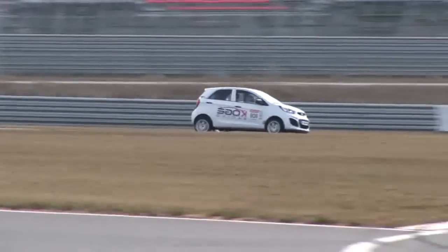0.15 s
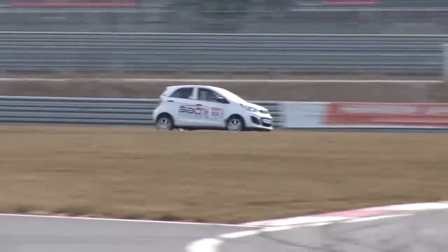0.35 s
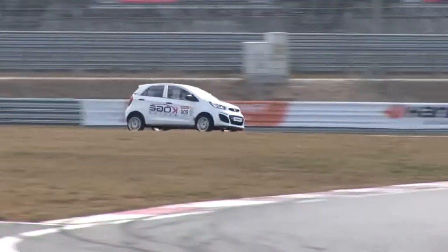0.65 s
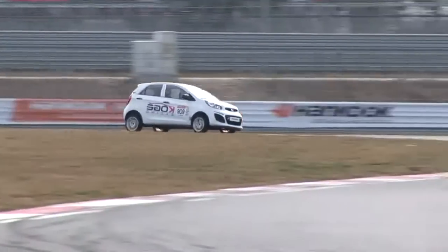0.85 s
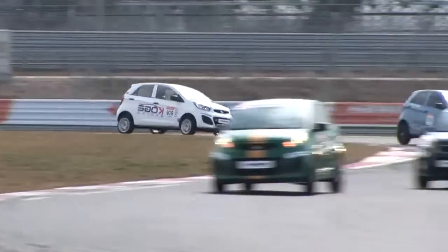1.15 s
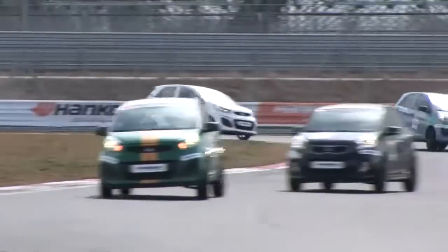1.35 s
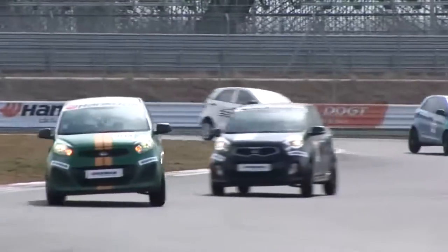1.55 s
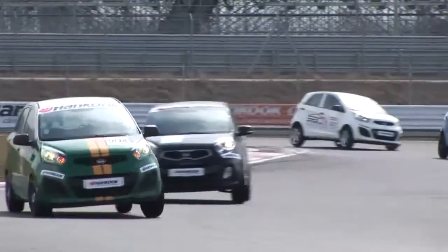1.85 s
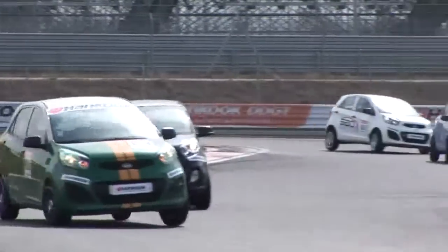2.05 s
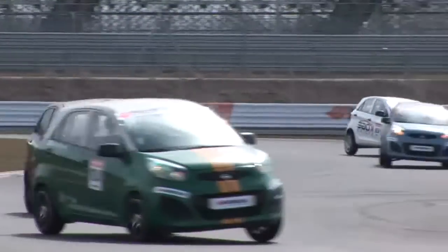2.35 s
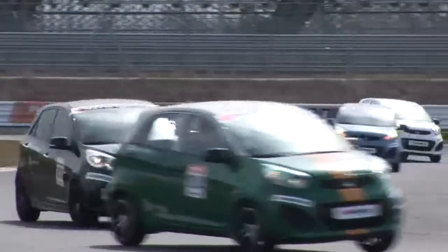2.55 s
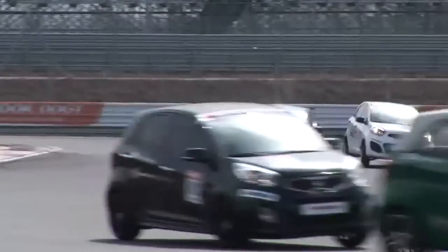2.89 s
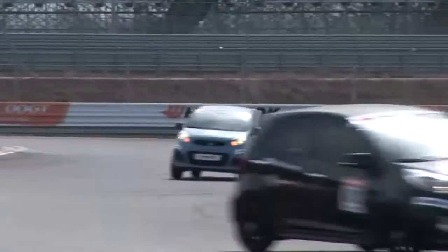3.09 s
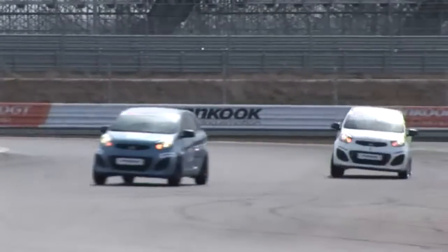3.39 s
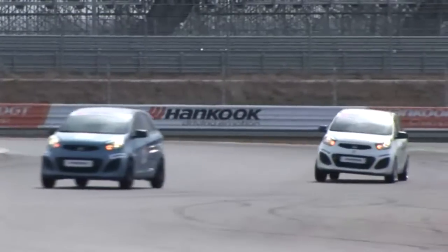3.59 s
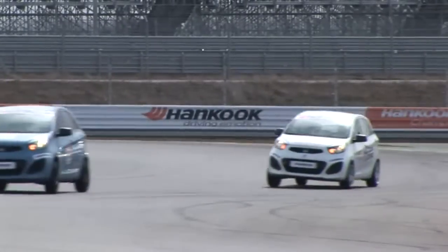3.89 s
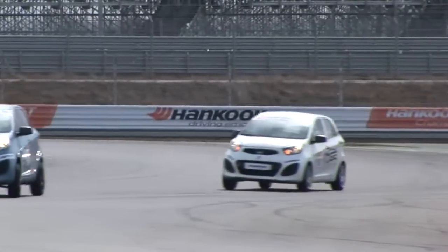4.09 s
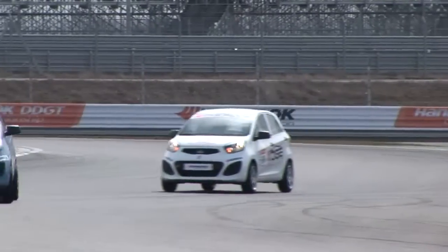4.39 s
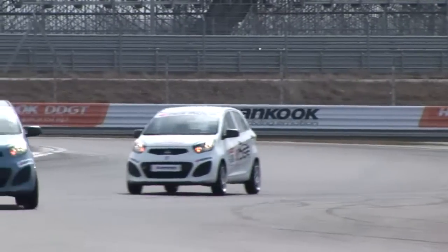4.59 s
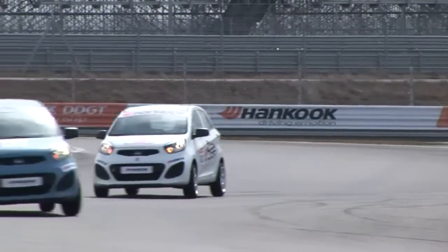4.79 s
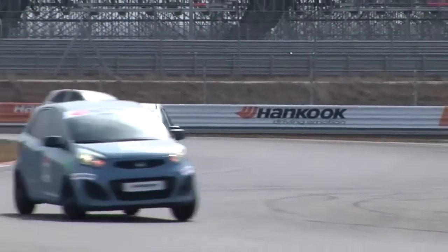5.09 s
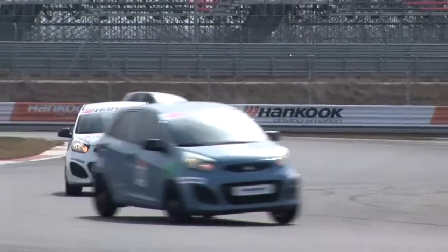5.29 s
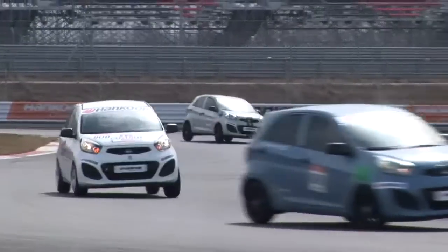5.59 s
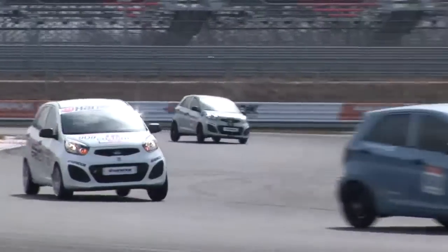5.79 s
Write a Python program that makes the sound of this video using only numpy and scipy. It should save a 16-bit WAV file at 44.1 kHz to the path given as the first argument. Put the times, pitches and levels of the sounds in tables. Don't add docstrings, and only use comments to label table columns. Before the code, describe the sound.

Small race cars squeal their tyres hard through a corner one after another, over low droning engines, scrubbing rubber and a rumbling wind.

```python
import sys
import numpy as np
from scipy import signal
from scipy.fft import rfft, irfft, next_fast_len
from scipy.io import wavfile
from scipy.ndimage import uniform_filter1d, minimum_filter1d

SR = 44100
rng = np.random.default_rng(int(sys.argv[2]) if len(sys.argv) > 2 else 0)


def dump(signal):
    limited = np.clip(np.atleast_2d(signal).T, -1, 1)
    pcm = np.round(limited * 32767).astype(np.int16)
    wavfile.write(sys.argv[1], SR, pcm)


def invert_db(level):
    return 10 ** (np.asarray(level, dtype=float) / 20)


N = 262035

# (frequency [Hz], level per Hz [dB])
WIND_COLOUR = [(15, -8), (35, -2), (60, 0), (120, 0), (250, -6.5), (500, -37)]
ROAR_COLOUR = [(40, -22.5), (90, -8), (200, 2.5), (330, 2), (500, 0.5), (800, -17.5), (1300, -18.5),
               (1800, -9.5), (2300, -32)]
SCRUB_COLOUR = [(350, -13.5), (550, 0.5), (750, 3), (950, -2), (1150, 0.5), (1450, -5), (1800, -11.5),
                (2300, -38)]
GRIT_COLOUR = [(1300, -13), (1800, 2.5), (2300, -2), (2800, -5.5), (3400, -13), (4000, -17), (4700, -21.5)]
SIDEWALL_COLOUR = [(700, -28.5), (860, -2), (950, 4.5), (1050, -15), (1200, -33)]
BITE_COLOUR = [(820, -25.5), (920, -1.5), (1020, -0.5), (1120, -14), (1250, -32)]
CHATTER_COLOUR = [(600, -24.5), (680, -6.5), (760, 1), (830, -15), (920, -25.5)]

# (peak time [s], rise to -6 dB [s], fall to -6 dB [s], peak level [dB])
GUSTS = [(0, .1, 0.012, -36), (.15, 0.061, 0.2, -44), (.52, .04, 0.26, -43.5), (1.21, .12, 0.037, -34),
         (1.32, 0.04, 0.052, -36), (1.68, 0.1, 0.26, -38), (2.16, 0.088, 0.094, -34),
         (2.41, .03, 0.078, -43.5), (2.63, .05, 0.09, -48.5), (3.18, 0.037, 0.023, -47),
         (4.58, 0.18, .15, -45), (4.95, 0.15, .05, -46.5)]
CARS_NEAR = [(1.1, .3, 0.48, -45.5), (2.1, 0.34, .3, -38.5), (2.95, 0.26, .15, -48),
             (4.05, 0.32, .25, -40.5), (4.6, 0.14, 0.27, -48.5), (5.6, 0.85, 0.33, -46.5)]
GRIT_SPRAYS = [(1.64, 0.18, .17, -47.5), (2.05, 0.19, 0.26, -45), (2.82, 0.089, .15, -42),
               (3.12, .07, .12, -41.5), (3.53, 0.22, 0.24, -39.5), (4.05, 0.021, 0.038, -43.5),
               (4.63, 0.18, 0.18, -46.5), (5.1, 0.13, 0.27, -56), (5.6, 0.12, 0.25, -46.5)]
MOANS = [
    (2.0, .25, 0.41, -36),
    (2.75, 0.39, 0.37, -32.5),
    (4.1, 0.34, 0.15, -39.5),
    (4.7, 0.081, .08, -43),
]
BITES = [
    (1.52, 0.11, .15, -34.5),
]
CHATTERS = [
    (4.73, 0.21, 0.056, -32.5),
    (5.1, 0.16, 0.063, -38),
]

# (time [s], firing rate [Hz], firing level [dB])
ENGINE_FAR = [(0, 162.4, -46), (.4, 158.2, -48.5), (.64, 152.1, -51.5)]
ENGINE_FAR_LATER = [(.56, 153, -42), (.78, 150.9, -39), (.95, 154.5, -45), (1.2, 159.7, -44), (1.45, 166, -43),
                    (1.7, 167.7, -44), (1.95, 165.6, -61.5)]
ENGINE_FIRST = [(1.3, 93.4, -39.5), (1.7, 96.2, -57.5), (1.95, 99, -43.5), (2.15, 100.2, -37),
                (2.45, 105, -46), (2.75, 108, -46.5), (2.85, 110.9, -61.5)]
ENGINE_LEAVING = [(3.0, 139.6, -59.5), (3.25, 134, -45.5), (3.55, 125.9, -65.5)]
ENGINE_SECOND = [(3.62, 130.5, -52), (3.8, 141.7, -42.5), (3.95, 154.7, -39.5), (4.15, 161.4, -44.5),
                 (4.32, 156.6, -45)]
ENGINE_THIRD = [(4.62, 132.4, -50.5), (4.9, 136.7, -44.5), (5.25, 140.3, -42), (5.6, 146.4, -39),
                (5.94, 150.2, -48.5)]

# (time [s], scrub level [dB])
SLIDE = [(0, -45), (.35, -49), (1.05, -46.5), (1.3, -39.5), (1.95, -38.5), (2.18, -31.5), (2.55, -35),
         (3.0, -32), (3.2, -29), (3.9, -30.5), (4.2, -35), (4.7, -34), (4.9, -40.5), (5.1, -41), (5.4, -36),
         (5.72, -34.5), (5.94, -37)]
# (start [s], length [s], start pitch [Hz], end pitch [Hz], level [dB])
BRAKE_WHISTLES = [(1.38, .2, 10950, 11000, -75), (1.55, .11, 11150, 11150, -72),
                  (1.68, .13, 11150, 11100, -72), (1.56, .2, 9555, 9560, -72),
                  (1.6, .11, 12700, 12700, -72), (1.56, .11, 7950, 7950, -76), (1.61, .11, 8200, 8200, -76),
                  (1.65, .11, 6600, 6600, -76), (1.83, .16, 10830, 10720, -72), (1.8, .1, 7780, 7780, -75),
                  (1.93, .11, 7640, 7640, -73), (2.03, .1, 7520, 7520, -73)]
# (time [s], turns made [count])
WHEEL_TURNS = [(1.6, -3), (1.845, 0), (2.415, 7), (2.94, 13), (3.04, 14), (3.1, 14.6)]

# (time [s], slip rate [Hz], tone level [dB], snap = second partial over tone [dB]) # faint
TYRE_EARLY = [(0.95, 653, -47, -16), (1.09, 664, -38.5, -15), (1.44, 670.4, -36, -15),
              (1.6, 662, -27.5, -37.5), (1.72, 693, -31.5, -28)]
TYRE_FIRST = [(1.63, 687.5, -35, -24), (1.73, 706, -25, -19), (1.8, 688.4, -26.5, -8.5),
              (2.05, 667.3, -19.5, -5), (2.2, 649, -19.5, -7), (2.41, 656.8, -17, 1),
              (2.63, 653.6, -20, -0.5), (2.9, 648.5, -17.5, -0.5), (3.06, 655, -21.5, -15)]
TYRE_SECOND = [(3.03, 632.7, -23, -5), (3.29, 630, -20.5, -6.5), (3.44, 634, -25, 6.5), (3.56, 618, -25, 4),
               (3.72, 603, -28.5, 3.5), (3.82, 605, -26.5, 7), (3.95, 611.3, -27, 6),
               (4.11, 608.4, -28.5, 6.5), (4.2, 593, -33.5, 2.5)]
TYRE_INNER = [(3.04, 654.6, -20, -4), (3.39, 652.5, -26, -3.5), (3.58, 638.2, -19, -5),
              (3.76, 633.8, -28, 2), (3.92, 626.6, -19.5, -9), (4.1, 623, -20.5, -7.5),
              (4.23, 655.6, -30, -24), (4.46, 709, -28.5, -20), (4.56, 737, -41.5, -3)]
TYRE_FADING = [(4.13, 602.1, -29, 1.5), (4.52, 604, -35.5, 10.5), (4.6, 597, -37, 7), (4.7, 601, -34, 6),
               (4.87, 616, -36, 5.5), (4.98, 638, -34, -7), (5.05, 655, -37.5, -23.5),
               (5.25, 690, -39.5, -5)]
TYRE_THIRD = [(5.18, 695, -36.5, -18), (5.3, 672, -27.5, -15), (5.38, 652.2, -24.5, -2.5),
              (5.52, 643, -24.5, 2), (5.63, 640, -22, -5), (5.73, 636, -25.5, -13.5), (5.83, 639, -27, -11),
              (5.94, 643, -36.5, -4)]


def in_time(rows, fade=0.022):
    times, *columns = np.transpose(rows)
    t = np.arange(N) / SR
    opening = np.clip((t - times[0]) / fade + (times[0] < .01), 0, 1)
    closing = np.clip((times[-1] - t) / fade + (times[-1] > 5.9), 0, 1)
    return [opening * closing] + [np.interp(t, times, column) for column in columns]


def swells(rows, rest_db=-120):
    t, gain = np.arange(N) / SR, invert_db(rest_db)
    for peak, rise, fall, db in rows:
        away = (t - peak) / np.where(t < peak, rise, fall)
        gain = gain + invert_db(db - 6 * away ** 2)
    return gain


def drift(rate_hz):
    r = np.exp(-16 * np.pi * rate_hz / SR)
    slow = signal.lfilter([1], [1, -2 * r, r * r], rng.standard_normal(N // 8 + 4002))[4000:]
    return np.interp(np.arange(N) / 8, np.arange(len(slow)), slow / slow.std())


def bed(colour, patchy_db):
    hz, level_db = np.transpose(colour)
    size = next_fast_len(N)
    grid = np.maximum(np.arange(size // 2 + 1) * SR / size, 1)
    shape = invert_db(np.interp(np.log(grid), np.log(hz), level_db, left=-90, right=-90))
    noise = irfft(rfft(rng.standard_normal(size)) * shape, size)[:N]
    noise = noise * invert_db(patchy_db * drift(9))
    return noise / noise.std()


def wind():
    return swells(GUSTS, rest_db=-58.5) * bed(WIND_COLOUR, 0.92)


def rolling_roar():
    return swells(CARS_NEAR, rest_db=-43) * bed(ROAR_COLOUR, 0.93)


def engine(rows, second_db, third_db):
    gate, firing_hz, firing_db = in_time(rows, fade=0.047)
    boom_db = 0.3 * (firing_db + 43)
    phase = 2 * np.pi * np.cumsum(firing_hz * (1 + .007 * drift(10))) / SR
    orders = 0
    for k, level_db in enumerate((firing_db, second_db + boom_db, third_db + boom_db), start=1):
        orders = orders + invert_db(level_db + 2.0 * drift(5.7)) * np.sin(k * phase)
    return gate * np.sqrt(2) * orders


def brake():
    t, out = np.arange(N) / SR, 0
    for start, length, from_hz, to_hz, db in BRAKE_WHISTLES:
        along = np.clip((t - start) / length, 0, 1)
        phase = 2 * np.pi * np.cumsum(from_hz + (to_hz - from_hz) * along) / SR
        envelope = np.sqrt(np.sin(np.pi * along) + 1e-12)
        out = out + invert_db(db + 2.5) * envelope * np.sin(phase)
    return out


def wheel_slip_db():
    gate, turns = in_time(WHEEL_TURNS)
    return gate * 3.0 * np.cos(2 * np.pi * (turns + 0.091))


def scrub():
    _, slide_db = in_time(SLIDE)
    return invert_db(slide_db + 4.0 + wheel_slip_db()) * bed(SCRUB_COLOUR, 0.8)


def grit():
    flutter_db = 3.0 + 0.45 * wheel_slip_db() + 0.71 * drift(35)
    return invert_db(flutter_db) * swells(GRIT_SPRAYS, rest_db=-57.5) * bed(GRIT_COLOUR, 1.7)


def sidewall():
    return swells(MOANS) * bed(SIDEWALL_COLOUR, 1.3) + swells(BITES) * bed(BITE_COLOUR, 0.62)


def chatter():
    return swells(CHATTERS) * bed(CHATTER_COLOUR, 4.9)


def wheel_swing():
    gate, turns = in_time(WHEEL_TURNS)
    return gate * .045 * uniform_filter1d(turns % 1 - .5, size=700)


def let_go_db():
    gate, turns = in_time(WHEEL_TURNS)
    return gate * -2 * np.cos(np.pi * turns) ** 8


def tyre(rows, third_db, rough, swing=0, dip_db=0):
    gate, slip_hz, tone_db, snap_db = in_time(rows)
    rough = np.clip(rough, 0, 1)
    third_db = tone_db + third_db + 0.84 * snap_db
    first_db = tone_db + 0.38 * dip_db + 1.5 * drift(19)
    second_db = tone_db + snap_db + dip_db
    levels_db = [first_db, second_db, third_db, third_db - 17.5, third_db - 28.5]
    blurs, blur_rates_hz = (.7, 1.4, 1.7, 4.0, 4.5), (55, 90, 109, 170, 200)
    wander = rough * (.012 * drift(18) + .035 * drift(60))
    phase = 2 * np.pi * np.cumsum(slip_hz * (1 + swing + wander)) / SR
    out = 0
    for k, (level_db, blur, blur_hz) in enumerate(zip(levels_db, blurs, blur_rates_hz), start=1):
        share = np.clip(blur * rough, 0, 1)
        stray = (drift(blur_hz) + 1j * drift(blur_hz)) / np.sqrt(2)
        size = np.sqrt(1 - share ** 2) + share * stray
        out = out + invert_db(level_db) * np.sqrt(2) * np.real(size * np.exp(1j * k * phase))
    return gate * out


def scene():
    background = wind() + rolling_roar()
    engines = engine(ENGINE_FAR, -43.5, -43.5) + engine(ENGINE_FAR_LATER, -43.0, -54)
    engines = engines + engine(ENGINE_FIRST, -47.5, -54.5) + engine(ENGINE_LEAVING, -46.5, -60.5)
    engines = engines + engine(ENGINE_SECOND, -55.5, -57.0) + engine(ENGINE_THIRD, -47, -65.5)
    sliding = scrub() + grit() + sidewall() + chatter()
    tyres = tyre(TYRE_EARLY, -14.5, 0.14) + tyre(TYRE_FIRST, -16.5, 0.338, wheel_swing(), let_go_db())
    tyres = tyres + tyre(TYRE_SECOND, -8, .35) + tyre(TYRE_INNER, -11.5, 0.2713)
    tyres = tyres + tyre(TYRE_FADING, -22, .3) + tyre(TYRE_THIRD, -7.5, 0.26)
    mono = background + engines + sliding + tyres
    right_db = -9
    sides = invert_db(np.array([[0], [right_db]])) * 2 / (1 + invert_db(right_db))
    return mono * sides + brake()


def band_limit(x):
    return signal.sosfilt(signal.butter(12, 13500, fs=SR, output="sos"), x)


def record(dry):
    ceiling = .8
    gain = minimum_filter1d(ceiling / np.maximum(abs(dry[0]), ceiling), size=601)
    gain = uniform_filter1d(uniform_filter1d(gain, size=300), size=300)
    return band_limit(dry * gain)


dry = scene()
out = record(dry)
dump(out)
```